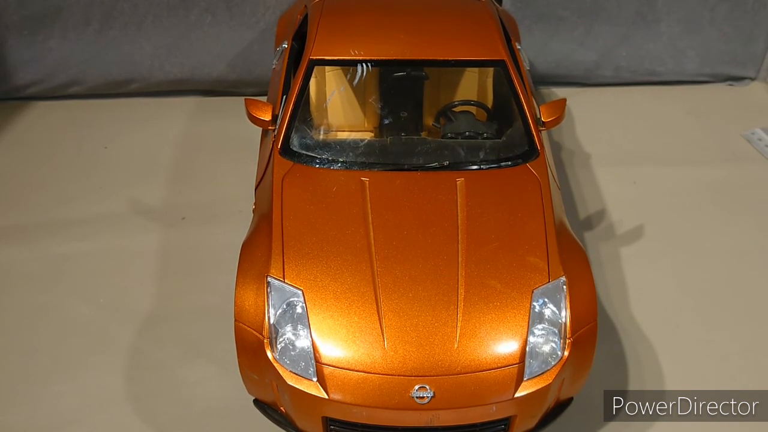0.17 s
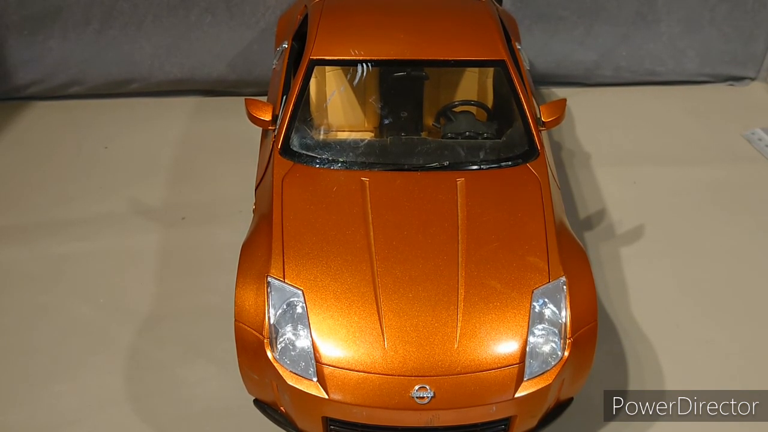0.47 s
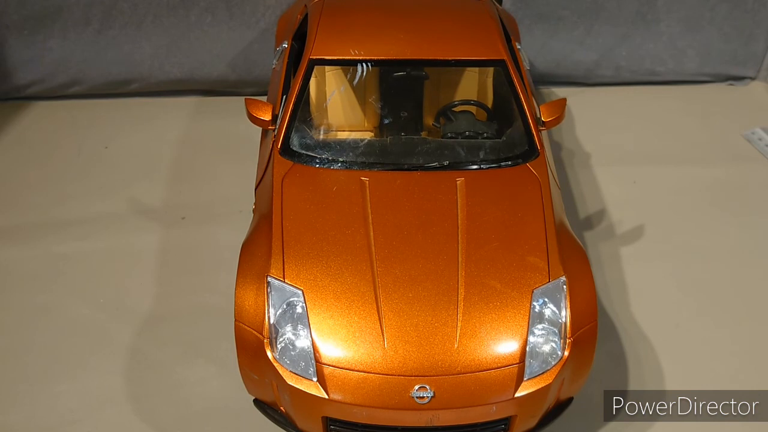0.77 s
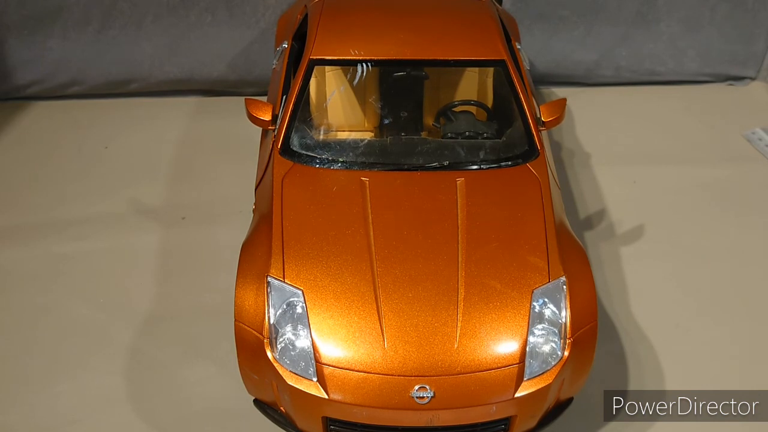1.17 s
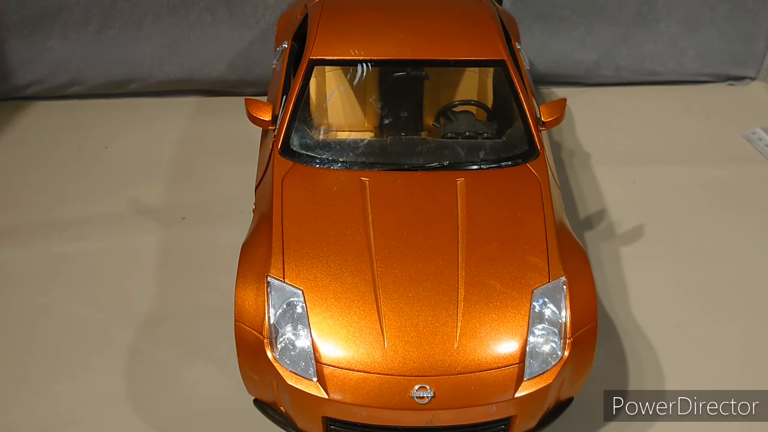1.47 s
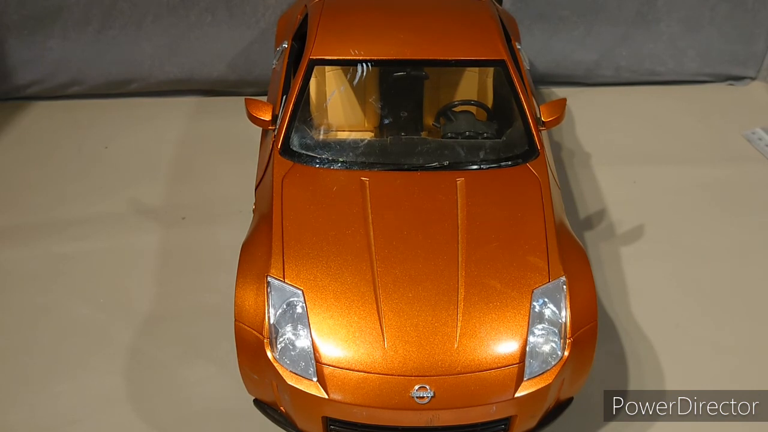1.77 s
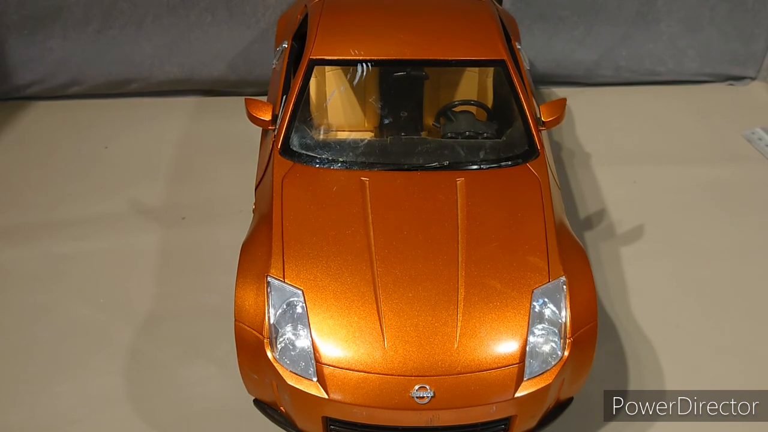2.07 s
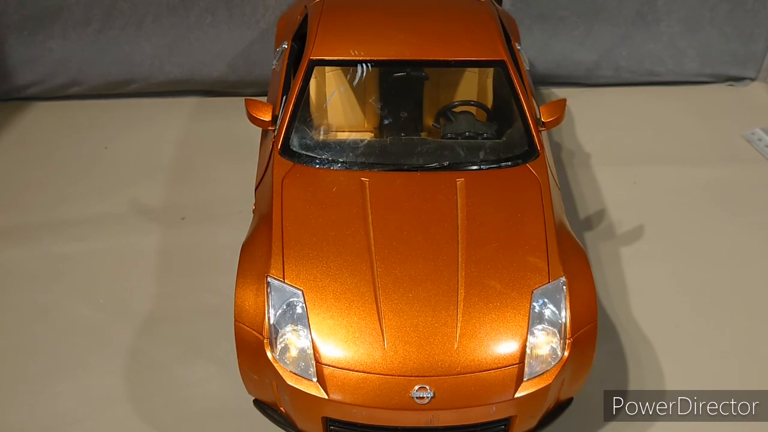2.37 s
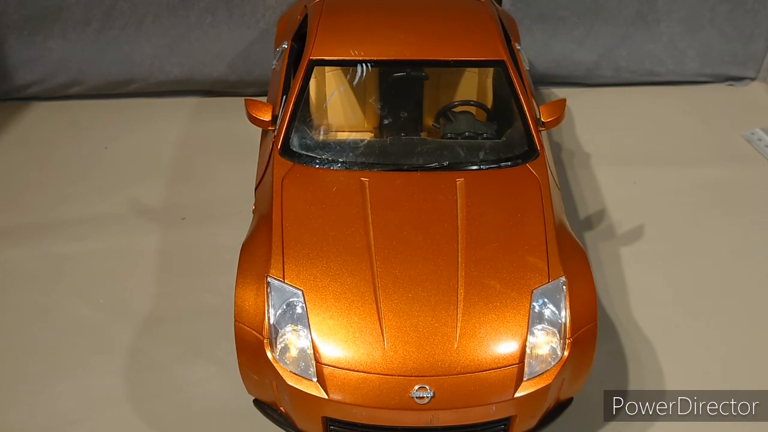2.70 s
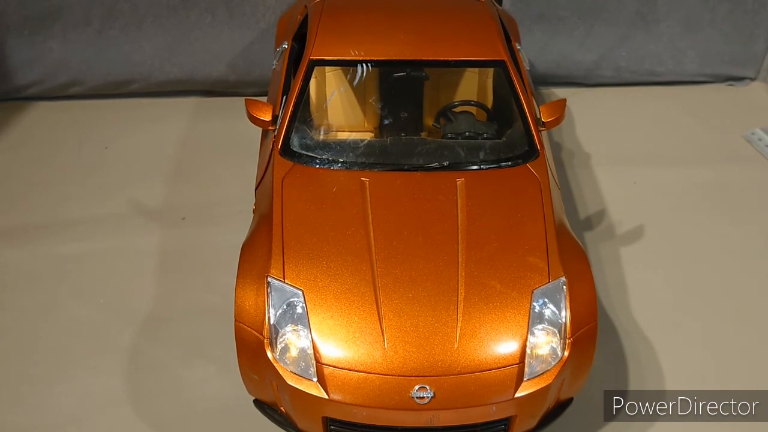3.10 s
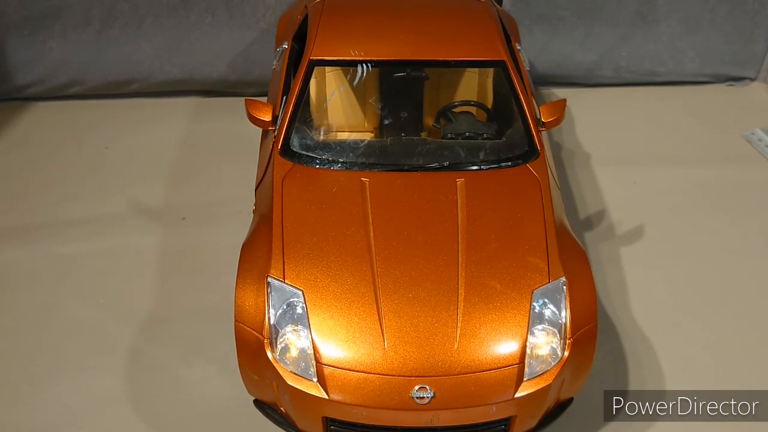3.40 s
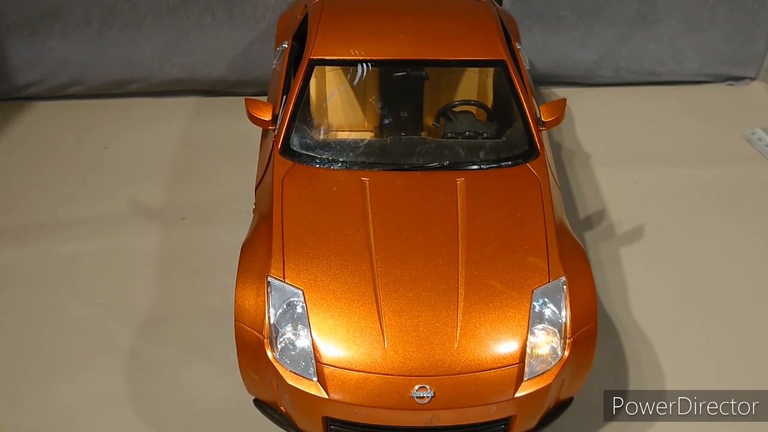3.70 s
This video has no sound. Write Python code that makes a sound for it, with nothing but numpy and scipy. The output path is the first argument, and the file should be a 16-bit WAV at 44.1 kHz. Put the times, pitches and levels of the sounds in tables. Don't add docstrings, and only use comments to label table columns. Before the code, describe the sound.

A small toy car motor jerks on and whirs loudly after a quiet electronic buzz.

```python
import sys
import numpy as np
from scipy import signal
from scipy.fft import rfft, irfft
from scipy.io import wavfile
from scipy.ndimage import uniform_filter1d

SR = 44100
rng = np.random.default_rng(int(sys.argv[2]) if len(sys.argv) > 2 else 0)


def dump(signal):
    limited = np.clip(np.atleast_2d(signal).T, -1, 1)
    pcm = np.round(limited * 32767).astype(np.int16)
    wavfile.write(sys.argv[1], SR, pcm)


def invert_db(level):
    return 10 ** (np.asarray(level, dtype=float) / 20)


N = 169785
TIME = np.arange(N) / SR
HZ = np.fft.rfftfreq(N, 1 / SR)
START_S = 2.2693


def evened(x):
    return x / np.sqrt(np.mean(x ** 2) + 1e-20)


def read(points, hz):
    f, value = np.transpose(points)
    return np.interp(np.log(hz + 1), np.log(f + 1), value)


def colour(x, points, lo_hz=0, hi_hz=SR):
    gain = invert_db(read(points, HZ)) * (HZ > lo_hz) * (HZ < hi_hz)
    return evened(irfft(rfft(x) * gain, N))


def drift(rate_hz, count):
    points = N // 32 + 2
    z = rfft(rng.standard_normal((count, points)))
    f = np.fft.rfftfreq(points, 32 / SR)
    curves = irfft(z / (1 + (f / rate_hz) ** 2), points)
    return evened(np.repeat(curves, 32, 1)[:, :N])


def bump(centre_s, width_s):
    return np.exp(-((TIME - centre_s) / width_s) ** 2)


# frequency_hz, likeness [0-1]
NOISE_LIKENESS = [(30, .86), (200, .95), (700, .8), (1500, .55), (5000, .3), (8000, 0)]


def pair(x, likeness=NOISE_LIKENESS):
    z, same = rfft(x), np.clip(read(likeness, HZ), 0, 1)
    shared, apart = np.sqrt((1 + same) / 2), np.sqrt((1 - same) / 2)
    return irfft(np.array([shared * z[0] + apart * z[1], shared * z[0] - apart * z[1]]), N)


CYCLE_HZ = 25.402
# multiple [of the cycle], left_db, right_db
BUZZ_STRONG = [(5, -67, -67), (11, -68, -65), (12, -55, -53), (13, -67, -66), (17, -61, -55), (18, -65, -77),
               (19, -56, -57), (21, -59, -78), (22, -59, -58), (23, -53, -56), (24, -51, -49), (25, -63, -60),
               (26, -61, -67), (27, -56, -58), (28, -48, -55), (29, -47, -47), (30, -51, -57), (31, -60, -64),
               (32, -48, -56), (33, -60, -60), (34, -52, -57), (35, -61, -55), (36, -53, -51), (37, -51, -54),
               (38, -61, -60), (39, -58, -65), (40, -68, -56), (41, -62, -51), (42, -68, -56),
               (49, -59, -68), (50, -60, -66), (51, -64, -65), (53, -63, -75), (58, -72, -66), (59, -62, -69),
             (65, -73, -68), (99, -67, -74), (100, -67, -71), (108, -79, -66), (111, -72, -71),
             (139, -70, -74), (140, -76, -74), (173, -82, -73), (185, -77, -84), (231, -73, -75),
             (233, -79, -72), (237, -71, -69), (239, -75, -78)]
# frequency_hz, level_db [rms]
BUZZ_REST = [(100, -79), (1100, -72), (1900, -84.5), (2700, -82), (3550, -86), (4000, -87), (5000, -98.5),
             (5900, -84), (6900, -97.5)]
# frequency_hz, lead [radians]
BUZZ_LEAD = [(300, 0), (500, 1.0), (700, .7), (780, .2), (870, .8), (900, 2.9), (940, 4.2), (1040, .9)]


def buzz(count=270):
    rest_spread_db, waver_db, duck_db = 6.5, .6, -10
    tick_hz, tick_width_hz, tick_db, tick_at_cycle = 2375, 70, -73, .69
    k = np.arange(1, count + 1)
    chance = rng.standard_normal((count, 4))
    db = read(BUZZ_REST, k * CYCLE_HZ)[:, None] + rest_spread_db * chance[:, :2]
    for multiple, left_db, right_db in BUZZ_STRONG:
        db[round(multiple) - 1] = left_db, right_db
    lead = read(BUZZ_LEAD, k * CYCLE_HZ) + 1.2 * chance[:, 2] * (k > 66)
    phase = 10 * chance[:, 3:] + np.stack([lead, -lead], 1) / 2
    off = (k * CYCLE_HZ - tick_hz) / tick_width_hz
    tick = abs(off) < 2
    db[tick] = (tick_db - 3 * off[tick] ** 2)[:, None]
    phase[tick] = (-2 * np.pi * tick_at_cycle * k[tick])[:, None]
    place = np.arange(4097) / 4096
    angle = 2 * np.pi * k[:, None] * place + phase.T[:, :, None]
    waves = np.sqrt(2) * invert_db(db).T[:, :, None] * np.cos(angle)
    out = np.zeros((2, N))
    for g, waver in enumerate(invert_db(waver_db * drift(4.1, count=6))):
        cycle = waves[:, g::6].sum(1)
        out += waver * np.array([np.interp(TIME * CYCLE_HZ % 1, place, side) for side in cycle])
    return out * invert_db(duck_db * np.clip((TIME - START_S) * 10, 0, 1))


# frequency_hz, level_db [per Hz]
ROOM = [(12, -44), (20, 5), (87, -15), (129, -9.5), (227, -35.5), (280, -23), (360, -46), (620, -120)]
HISS = [(250, -23), (700, -7), (1100, -9), (1900, -22), (2500, -14.5), (5500, -23), (7000, -26),
        (15500, -25.5)]


def room():
    rumble = colour(pair(rng.standard_normal((2, N))), ROOM, hi_hz=267.5)
    hiss = colour(pair(rng.standard_normal((2, N))), HISS, lo_hz=216)
    side_db = np.array([[-.7], [.7]])
    return invert_db(-52.5 + side_db + 0.83 * drift(8.6, count=1)) * rumble + invert_db(-58.5) * hiss


# start_s, level_db
TICKS = [
    (.465, -50),
    (.994, -47),
    (1.18, -51),
    (1.568, -49),
    (1.82, -52),
    (2.105, -51),
]


def ticks():
    t, out = np.arange(900) / SR, np.zeros((2, N))
    band = signal.butter(2, [2800, 6000], 'band', fs=SR)
    for s, db in TICKS:
        snap = signal.lfilter(*band, rng.standard_normal((2, len(t))))
        out[:, round(s * SR):][:, :len(t)] += invert_db(db - 60 * t / .06) * snap
    return out


def spin_up():
    top_hz, from_s, time_constant_s = 231.1, 2.263, .07
    hz = top_hz * (1 - np.exp(-np.maximum(TIME - from_s, 0) / time_constant_s))
    slow = np.clip(6 * (.97 - hz / top_hz), 0, 1)
    late = {1: np.clip(25 * (.89 - hz / top_hz), 0, 1), 3: np.clip(8 * (.99 - hz / top_hz), 0, 1)}
    return hz, np.cumsum(hz) / SR, slow, late


# start_s, effort_db
MOTOR = [
    (2.267, -11.5),
    (2.29, -4),
    (2.315, 2),
    (2.36, 7),
    (2.41, 4.5),
    (2.471, 5.5),
    (2.6, 4),
    (3.85, 3.5),
]
# start_s, clatter_db, whine_db
THROBS = [(2.564, 6, -6), (2.613, 4, -3), (2.652, 4.7, -11), (2.692, 5.4, -3.5), (2.74, 5, -9),
          (2.787, 5.5, -10), (2.83, 6.5, -13), (2.876, 5.5, 0), (2.916, 6, -6), (2.965, 5, -11),
          (3.016, 6, -9), (3.06, 5.5, -10), (3.106, 5.9, -11), (3.155, 5, -5.5), (3.191, 4, -4),
          (3.226, 4.5, -3), (3.259, 4.5, -6), (3.298, 5, -7), (3.346, 6, -10), (3.386, 4.5, -7),
          (3.435, 6.5, -6), (3.484, 6.5, -8), (3.535, 6, -12), (3.572, 6, -14), (3.622, 5, -14),
          (3.658, 6, -10), (3.729, 5.5, 1), (3.781, 5, 1), (3.829, 6.5, -7)]
# start_s, level_db
WHINE = [(2.46, -4.5), (2.52, 1), (3.3, 0.5), (3.335, 4), (3.37, 1), (3.52, -1.5), (3.555, 7.5), (3.6, 1),
         (3.64, 0.5), (3.76, -0.5), (3.8, 5.5), (3.85, 6)]


def load():
    effort_db = np.interp(TIME, *np.transpose(MOTOR))
    clatter_db = sum(db * bump(s, .012) for s, db, _ in THROBS)
    clatter_db = clatter_db - 2.5 * np.clip((TIME - THROBS[0][0]) * 10 + 1, 0, 1)
    whine_db = np.interp(TIME, *np.transpose(WHINE)) + sum(db * bump(s, .008) for s, _, db in THROBS)
    return effort_db, clatter_db, whine_db


# multiple [of shaft speed], level_db, waver_hz
TONES = [(1, -39, .6), (2.8, -40, 12), (2.897, -37, 6), (3, -27.5, 3.5), (3.31, -43, 5), (3.9, -46, 5),
         (4, -46, 3), (5, -49, 4), (6, -45, 4), (7.9, -48, 12), (16.13, -45, 15), (23.88, -45, 20)]
# multiple [of shaft speed], frequency_hz, width_hz, boost_db
PASSES = [(7.9, 790, 110, 15), (7.9, 1200, 260, 23), (16.13, 2900, 300, 13), (16.13, 3370, 220, 17),
          (23.88, 3300, 400, 14), (23.88, 4400, 420, 19)]


def shaft_tones(hz, turns, slow, late, effort_db, whine_db):
    wanders, swells, roughs = [drift(rate, count=len(TONES)) for rate in (26.5, 4.8, 60)]
    out = np.zeros(N)
    for (k, db, width_hz), wander, swell, rough in zip(TONES, wanders, swells, roughs):
        level_db = db - 20 * late.get(round(k), 0) + np.minimum(effort_db, 0) / 2
        level_db = level_db + 1.5 * slow * rough * (k > 7)
        if k == 3:
            level_db = level_db + whine_db
        else:
            level_db = level_db + 2.9 * min(width_hz / 4, 1) * swell * (1 - slow)
        for multiple, f, pass_hz, boost_db in PASSES:
            if multiple == k:
                level_db = level_db + boost_db * np.exp(-((k * hz - f) / pass_hz) ** 2)
        waver_hz = width_hz * (wander + 1.5 * slow * rough * (k > 10))
        out += invert_db(level_db) * np.sqrt(2) * np.cos(2 * np.pi * (k * turns + np.cumsum(waver_hz) / SR))
    return out


# frequency_hz, likeness [0-1]
RATTLE_LIKENESS = [(220, .97), (320, .5), (540, .55), (680, .9), (820, .35), (1300, .65), (5000, .5),
                   (12000, .5)]


def gear_teeth(turns, effort_db, clatter_db, whine_db):
    clicks = invert_db(2.2 * np.minimum(rng.exponential(1, (2, N)), 4)) * (rng.random((2, N)) < 9000 / SR)
    strikes = evened(clicks * rng.choice([-1., 1.], (2, N))) + 1.2 * rng.standard_normal((2, N))
    once_a_turn, once_in_four = np.cos(2 * np.pi * turns), np.cos(np.pi * turns / 2)
    teeth = invert_db(0.5 * once_a_turn + 0.56 * once_in_four + 0.22 * drift(45, count=1))
    drive = teeth * pair(strikes, RATTLE_LIKENESS) * invert_db(effort_db) * (TIME > START_S)
    low, high = drive * invert_db(0.41 * whine_db), drive * invert_db(1.08 * clatter_db)
    bright = 1 / (1 + (1400 / (HZ + 1)) ** 4)
    return irfft(rfft(low) * (1 - bright) + rfft(high) * bright, N)


def resonate(x, hz, width):
    r = np.exp(-np.pi * width / SR)
    poles = [1, -2 * r * np.cos(2 * np.pi * hz / SR), r * r]
    once = signal.lfilter([1, 0, -1], poles, x)
    return signal.lfilter([1, 0, -1], poles, once)


# frequency_hz, level_db [per Hz]
SHELL = [(160, -64), (280, -19), (524, -19.5), (689, -16), (1010, -7.5), (1240, -12.5), (5190, -12),
         (5630, -13), (7300, -15), (9490, -57), (16100, -120)]
FIZZ = [(6800, -54), (7200, 3), (8100, 1.5), (8600, 0), (9300, 1.5), (12000, 0.5)]
# frequency_hz, width_hz, level_db
RINGS = [(660, 364, -34), (875, 100, -48), (1230, 82, -42.5), (1304, 290, -38.5), (1806, 110, -41.5),
         (2016, 250, -42.5), (2806, 105, -48.5), (3706, 180, -41.5), (4386, 380, -41), (5560, 160, -37),
         (5850, 290, -37.5), (6495, 510, -39)]


def shell_rattle(drive, slow, clatter_db):
    out = invert_db(-24) * colour(drive, SHELL, 250, 7070)
    for (f, width_hz, db), swell in zip(RINGS, drift(24, count=len(RINGS))):
        slow_db = -8 * slow * (f < 2100) + 4 * slow * (f > 5000)
        out = out + invert_db(db + slow_db + 2.2 * swell * (f > 700)) * evened(resonate(drive, f, width_hz))
    out = out + invert_db(-28) * colour(drive * invert_db(-.3 * clatter_db), FIZZ, lo_hz=6800)
    on = TIME > START_S
    return out / np.sqrt(N / on.sum()) * on


# frequency_hz, level_db [per Hz]
SHAKE = [(20, -15), (43, 4.5), (90, -8), (200, -0.5), (300, -22)]


def bench_shake(slow):
    return invert_db(-44 + 8 * slow) * colour(pair(rng.standard_normal((2, N))), SHAKE, hi_hz=314.0)


# frequency_hz, lead [radians]
RATTLE_LEAD = [(300, .15), (3200, .15), (4900, 3), (12000, 3.2), (14000, 5.5)]
# frequency_hz, difference_db
SIDEWAYS = [(200, -2.3), (450, -0.5), (700, 1), (2000, 0.5), (4000, -3), (6000, -7), (8000, -1.5),
            (12000, 0.7)]
# from_hz, to_hz, level_db
CENTRE_DIPS = [(8300, 9050, -8.5), (9750, 10600, -6.5), (15150, 15500, -6)]


def paths(x, spread=0.81, from_hz=900):
    scatter = rng.standard_normal(len(HZ))
    scatter = evened(uniform_filter1d(uniform_filter1d(scatter, 300), 300))
    turn = read(RATTLE_LEAD, HZ) / 2 + spread * scatter * HZ ** 2 / (HZ ** 2 + from_hz ** 2)
    side = invert_db(read(SIDEWAYS, HZ) / 2)
    left, right = rfft(x) * np.array([side * np.exp(1j * turn), np.exp(-1j * turn) / side])
    centre_db = sum(db * (HZ > lo) * (HZ < hi) for lo, hi, db in CENTRE_DIPS)
    lost = (left + right) / 2 * (1 - invert_db(centre_db))
    return irfft(np.array([left - lost, right - lost]), N)


def motor():
    hz, turns, slow, late = spin_up()
    effort_db, clatter_db, whine_db = load()
    tones = shaft_tones(hz, turns, slow, late, effort_db, whine_db) * (TIME > START_S)
    drive = gear_teeth(turns, effort_db, clatter_db, whine_db)
    rattle = shell_rattle(drive, slow, clatter_db)
    out = paths(rattle) + paths(tones, spread=.35) + bench_shake(slow)
    return out * np.clip((TIME - START_S) * 1500, 0, 1)


# start_s, pitch_hz, level_db, t60_s
JERK = [
    (2.282, 165, -24, 0.15),
    (2.298, 41, -33, 0.18),
    (2.285, 260, -32, 0.21),
    (2.27, 550, -34, 0.72),
    (2.315, 880, -29.5, 0.79),
    (2.39, 3195, -19, .12),
    (3.813, 1245, -26, 0.19),
]


def jerk():
    rise_s, out = 0.0096, np.zeros(N)
    for s, hz, db, t60 in JERK:
        t = np.maximum(TIME - s, 0)
        out += invert_db(db - 60 * t / t60) * np.minimum(t / rise_s, 1) * np.sqrt(2) * np.sin(2 * np.pi * hz * t)
    return out


def scene():
    return buzz() + room() + ticks() + motor() + jerk()


def band_limit(x):
    return signal.sosfilt(signal.butter(12, 15490, fs=SR, output="sos"), x)


def record(dry):
    edge_hz = 15490
    mix = irfft(rfft(dry) * (HZ < edge_hz), N)
    return band_limit(mix)


dry = scene()
out = record(dry)
dump(out)
```